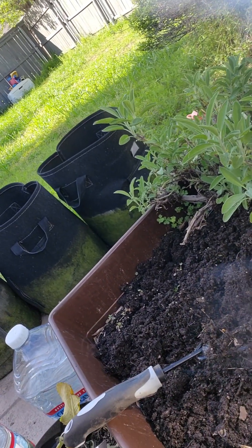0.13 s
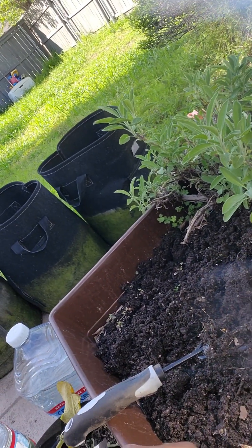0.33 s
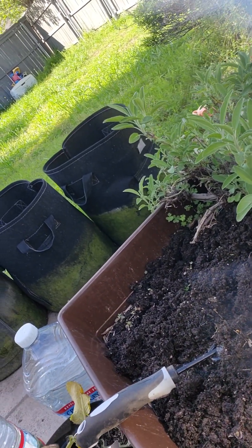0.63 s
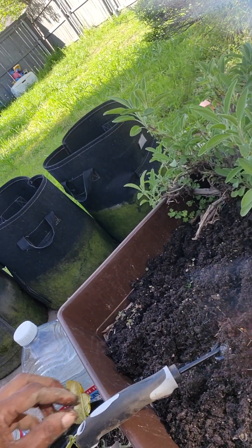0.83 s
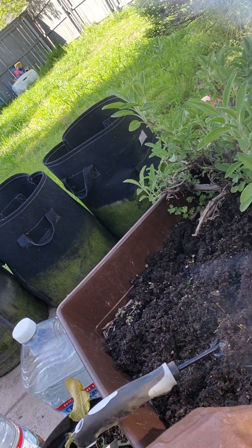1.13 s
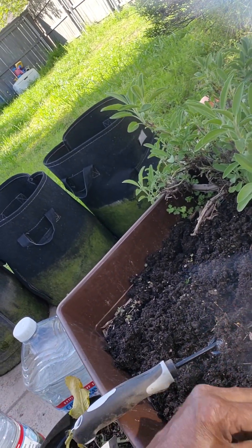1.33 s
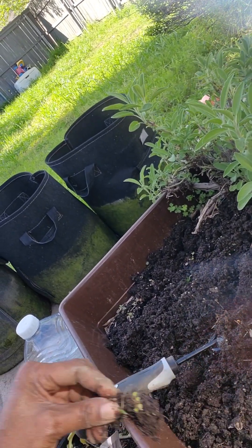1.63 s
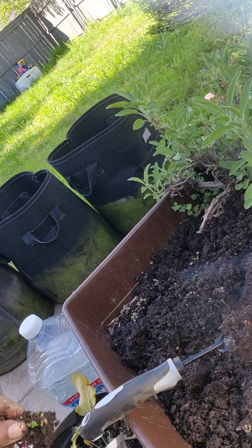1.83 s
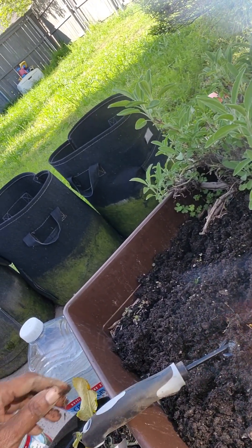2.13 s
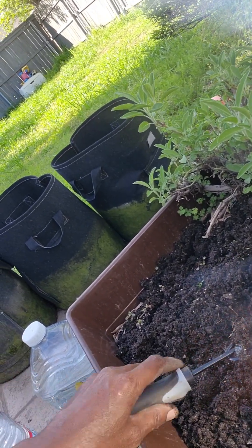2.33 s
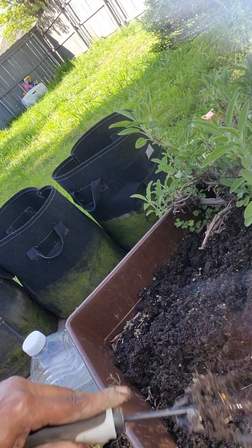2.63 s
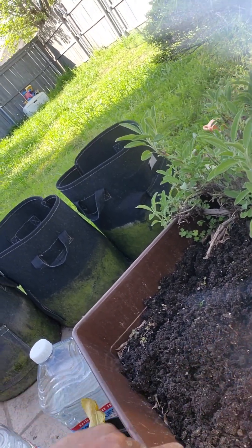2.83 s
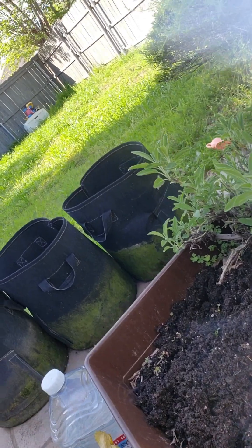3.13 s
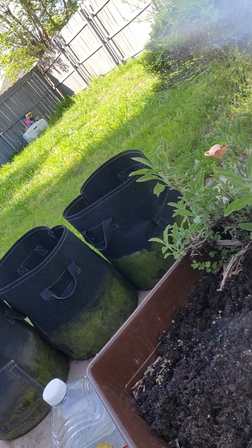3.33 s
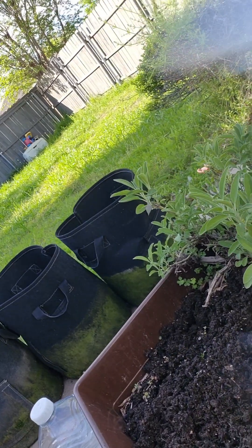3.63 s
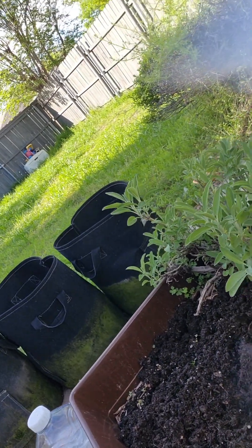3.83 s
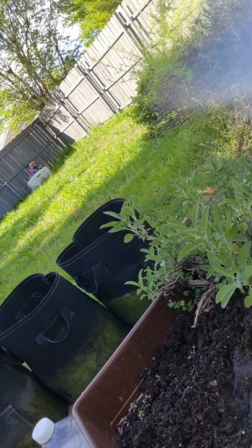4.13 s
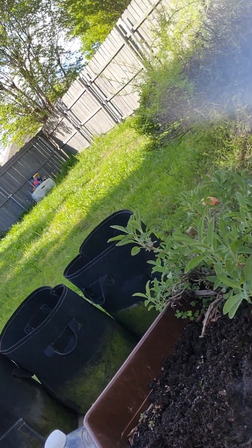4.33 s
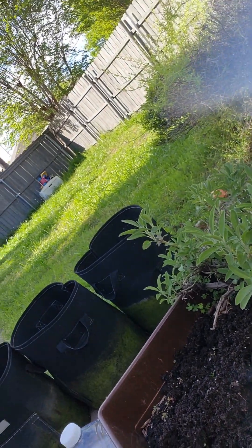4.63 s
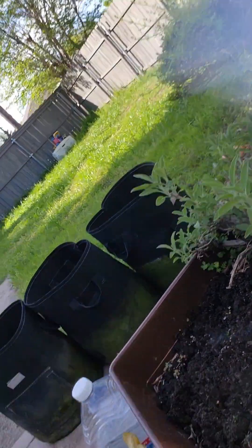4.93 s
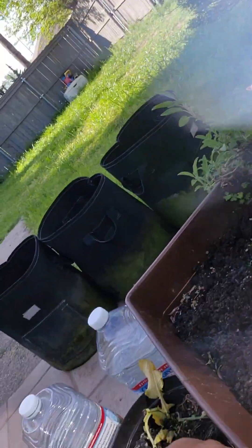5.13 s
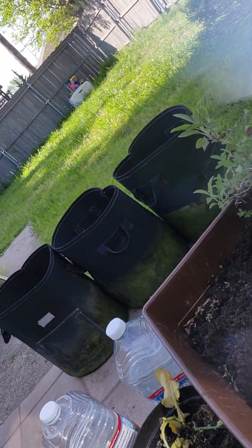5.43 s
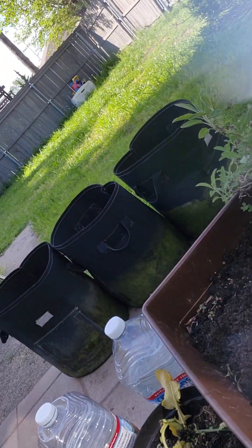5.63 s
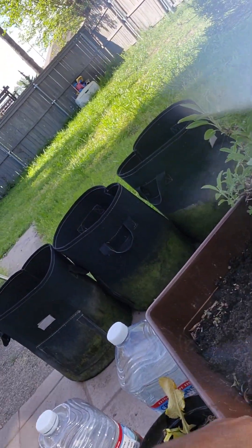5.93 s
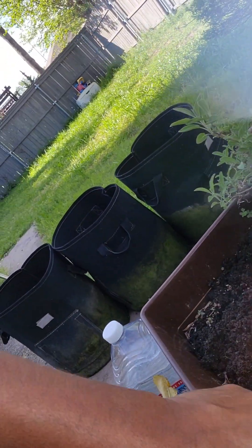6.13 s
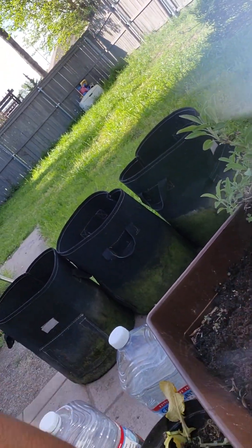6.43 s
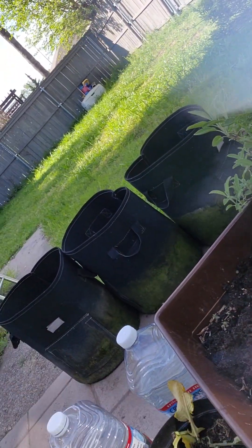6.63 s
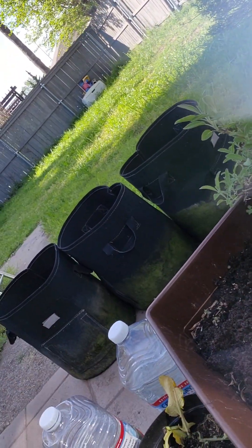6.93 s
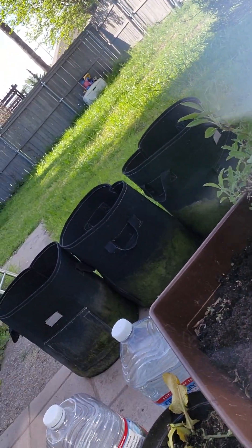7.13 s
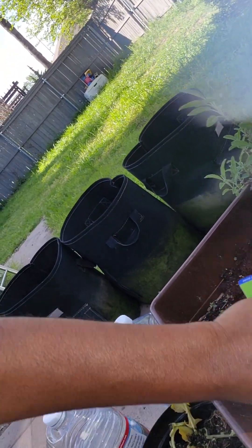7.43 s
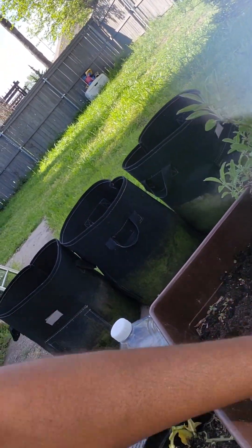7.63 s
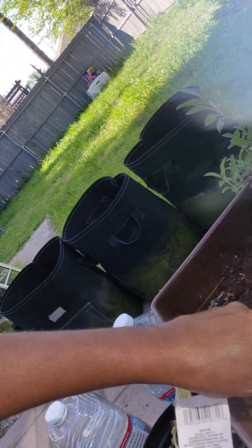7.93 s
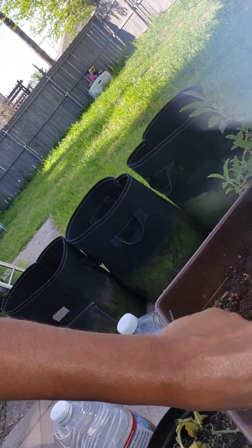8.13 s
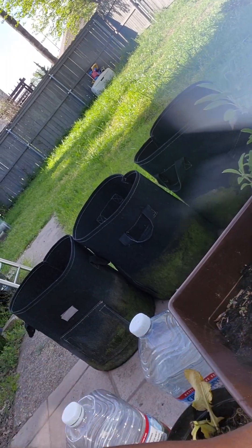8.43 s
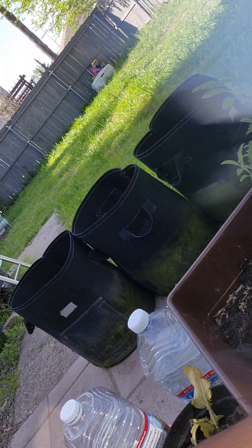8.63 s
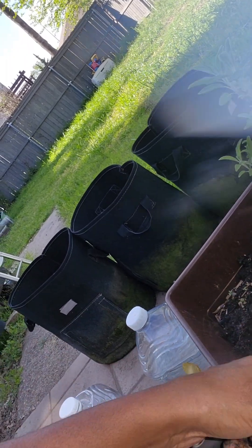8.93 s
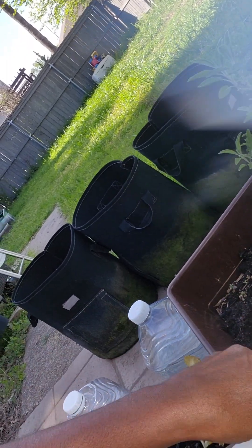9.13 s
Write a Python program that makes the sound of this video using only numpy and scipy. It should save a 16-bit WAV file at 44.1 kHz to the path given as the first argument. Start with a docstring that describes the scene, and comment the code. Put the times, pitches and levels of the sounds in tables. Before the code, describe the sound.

Close weeding in a back yard, over a steady low town rumble, far traffic and a faint machine hum. In the first second, dry stems give a few small, bright snaps and soil crumbles softly. Very faint, distant bird-like whistles step upward between about 1 and 3 seconds. From around 2.3 seconds a sleeve rustles with each arm stroke, and a hand tool lightly taps a plastic planter amid more crackling. A sharp stem crack comes at 3.7 seconds, followed by roots tearing and soil crunching. The loudest sounds are two hollow knocks on the planter, each with a crisp snap, at about 5.1 and 6.1 seconds, with lighter knocks near 5.4. A cluster of dry crackles and a tap follows around 7 to 7.4 seconds. Softer crunches, snaps and taps thin out by about 9 seconds.

```python
"""Back yard: weeding a plastic planter, close by.
Roots tear and soil crumbles in clouds of tiny fractures; dry stems crack and ring briefly.
A sleeve rustles by friction with each arm stroke. A hand tool knocks the planter, ringing its walls.
Behind: town rumble, far traffic, a machine's hum and a few faint far whistles."""
import sys
import numpy as np
from scipy import signal
from scipy.fft import rfft, irfft, next_fast_len
from scipy.io import wavfile

SR = 44100
rng = np.random.default_rng(int(sys.argv[2]) if len(sys.argv) > 2 else 0)


def dump_mix(stems):
    """Bounce the given channels to the path in sys.argv[1] as a 16-bit WAV at rate SR."""
    frames = np.atleast_2d(stems).T  # one column per channel
    limited = np.clip(frames, -1, 1)  # hard clip at full scale
    pcm = np.round(limited * 32767).astype(np.int16)
    wavfile.write(sys.argv[1], SR, pcm)


N = 409248
TIME_S = np.arange(N) / SR

# stereo likeness of noise: (frequency [Hz], left-right correlation [ratio])
CORRELATION = [(30, 0.72), (100, 1), (500, 0.81), (1200, 0.043), (4000, 0.046), (9000, 0.6), (15000, 0.15)]
# low background: (time [s], rumble [dB], murmur [dB])
YARD_LEVELS = [(0.0, -49.5, -56), (0.41, -46.5, -55), (1.6, -49.5, -53), (3.18, -47.5, -54),
               (3.77, -40.5, -51), (4.11, -47.5, -50), (4.5, -42, -47.5), (4.91, -48.5, -49.5),
               (5.35, -45, -50.5), (6.59, -49.5, -49.5), (8.92, -46, -53), (9.28, -44.5, -49.5)]
# town rumble: (frequency [Hz], density [dB])
RUMBLE_SPECTRUM = [(20, -29), (32, -13.5), (45, -1.5), (70, -2.5), (100, 0.5), (130, 4.5), (165, -11),
                   (230, -9.5), (400, -35)]
# low murmur: (frequency [Hz], density [dB])
MURMUR_SPECTRUM = [(120, -32.5), (200, 0), (260, -1.5), (350, 3), (440, -7), (560, -11.5), (750, -22.5),
                   (1200, -21)]
# far traffic and leaves: (frequency [Hz], density [dB])
FAR_SPECTRUM = [(300, -1), (550, 0.5), (700, 7), (790, -0.5), (890, 4.5), (990, -1.5), (1080, -1.5),
                (1250, -6.5), (1480, -3), (1750, -13), (3000, -23.5), (4800, -26), (10500, -32),
                (16000, -25)]
# machine hum: (frequency [Hz], rms level [dB])
HUM_PARTIALS = [(120, -66.5), (241, -57.5), (719, -71.5), (885, -80.5)]
# roots tearing, soil crumbling or pressed: (time [s], length [s], level [dB], centre [Hz])
SOIL_CRUNCHES = [(0.042, 0.23, -62.5, 11900), (0.586, 0.052, -63.5, 11500), (0.713, 0.037, -58, 9500),
                 (0.73, 0.02, -53.5, 1700), (1.213, 0.14, -66, 7500), (1.893, 0.027, -57, 11100),
                 (2.025, 0.054, -54, 4500), (2.027, 0.033, -51, 1600), (2.3, 0.014, -59.5, 7000),
                 (2.378, 0.073, -54, 5540), (2.408, 0.034, -47.5, 1110), (2.781, 0.068, -46, 6100),
                 (2.783, 0.044, -43.5, 730), (3.258, 0.025, -61, 1100), (3.604, 0.12, -52, 6200),
                 (4.137, 0.01, -59, 1700), (4.208, 0.11, -54, 2600), (4.523, 0.043, -45.5, 800),
                 (4.654, 0.062, -41.5, 2680), (5.126, 0.022, -32, 1880), (5.749, 0.015, -54.5, 3520),
                 (6.126, 0.011, -36, 3000), (6.043, 0.041, -54, 11000), (6.236, 0.017, -36, 11000),
                 (6.44, 0.025, -47.5, 3550), (7.036, 0.048, -48, 6360), (7.149, 0.012, -38.5, 3200),
                 (7.165, 0.045, -49, 4400), (7.232, 0.016, -47, 1700), (7.557, 0.14, -56, 2130),
                 (8.06, 0.024, -52, 2580), (8.109, 0.065, -46, 1900), (8.127, 0.023, -48, 4650),
                 (8.186, 0.012, -45, 915), (8.476, 0.073, -58, 2300), (8.813, 0.0093, -55.5, 2000)]
# dry stems, thin ones brighter, and the bright crack of the tool's blows at 5.12, 6.12 and 8.59 s: (time [s],
# level [dB], tilt [dB/oct], ring [Hz], left over right [dB])
SNAPS = [(0.0924, -31, 7.5, 14800, -10), (0.16, -39.5, 3, 8500, -6), (0.72, -32.5, 7, 8350, -3),
         (0.7215, -33, 5, 5250, -4.5), (0.782, -51, -1, 4900, -4), (0.821, -40, 1, 8400, -8),
         (0.828, -34, 10, 14500, -12), (0.834, -42.5, -4, 5200, -6), (2.056, -42, 7, 13500, -7),
         (2.072, -41, -2, 8500, -4), (2.191, -47.5, -3.5, 8550, -5), (2.5623, -45.5, -2, 8550, -2),
         (2.752, -34.5, 5, 4700, -4), (2.801, -30, 0, 14100, 0), (2.8101, -27.5, -2, 8360, -2),
         (2.85, -34, 1, 12900, -5), (2.9592, -28.5, 4, 13600, -5), (3.414, -44, -2, 13000, -5),
         (3.6992, -17, -1.5, 4400, -3.5), (3.77, -43, -3.5, 8800, -6), (4.089, -35, 11, 15000, -5),
         (4.1065, -25.5, -3, 8800, -5), (4.67, -33.5, 1, 4600, -13), (4.6938, -31, 1, 12900, -8),
         (4.94, -47, -7, 8450, -9), (5.12, -17, 7, 8200, -4), (5.613, -39, 5, 12500, -7),
         (6.1174, -19, -2.5, 12600, -7.5), (6.1874, -33, 5, 8640, -4), (6.2245, -31, -1.5, 8500, -1),
         (6.25, -20.5, 4.5, 12300, -2), (6.572, -35.5, -9, 4500, -4), (6.8835, -38.5, -1, 8500, -4),
         (7.004, -34, 1, 5630, -8), (7.031, -32, 5, 6300, -2), (7.036, -36, 3, 6100, -8),
         (7.0425, -35.5, -1, 5750, -1), (7.067, -33.5, -1, 5320, -7), (7.073, -36, -1, 8400, -7),
         (7.156, -27, -1, 7760, 1), (7.16, -29.5, 0, 7400, -11), (7.177, -45, -3, 8500, -5),
         (7.19, -42, 1, 8500, -5), (7.2977, -42.5, -5, 2700, -5), (7.415, -34.5, 1.5, 5500, -4),
         (7.826, -40.5, -7, 2270, -10.5), (8.085, -36, -6, 5060, 1), (8.119, -30, -2, 15000, -6),
         (8.5928, -36.5, 1, 6960, -6)]
# bright ranges shared by every close sound, which colour each crack: (low edge [Hz], high edge [Hz])
CRACK_BANDS_HZ = [(1800, 3700), (4000, 5630), (7850, 10360), (12400, 15330)]
# far notes, stepping up then falling: (time [s], length [s], pitch [Hz], level [dB])
WHISTLE_NOTES = [(1.01, .09, 1970, -80), (1.158, 0.083, 2090, -77.5), (1.283, 0.07, 2250, -77),
                 (1.39, .1, 2580, -85), (1.583, 0.83, 2980, -81.5), (2.212, 0.31, 2830, -75),
                 (2.467, 0.39, 2880, -81), (2.83, .12, 3000, -77), (3.078, 0.12, 2580, -71)]
# arm strokes: (time [s], length [s], rustle [dB], weave rasp [dB])
ARM_STROKES = [(2.286, 0.77, -69, 3), (2.943, 0.095, -55.5, 1), (3.103, 1, -64.5, 5.5),
               (4.083, 0.64, -60.5, 8.5), (4.316, 0.36, -59.5, -7), (4.584, 0.11, -55.5, 3),
               (5.082, 0.43, -56.5, -2), (5.39, 0.085, -53.5, 6), (5.641, 0.072, -66.5, -36),
               (6.136, 0.28, -56.5, 3.5), (6.499, 0.093, -53, 3), (6.677, 0.18, -57, -7),
               (7.035, 0.84, -61, 3), (8.004, 0.12, -59, 4), (8.184, 0.24, -64.5, -1),
               (8.381, 0.18, -58.5, 5), (8.907, 0.051, -62, 0)]
# cloth friction: (frequency [Hz], density [dB])
CLOTH_SPECTRUM = [(350, -12.5), (600, 3.5), (1000, -2.5), (1500, -4.5), (2300, -5), (3500, -8), (5000, -6),
                  (6500, -10.5), (7700, -10.5), (8700, -5.5), (10700, -12.5), (13000, -8), (16000, -13.5)]
# tool on planter: (time [s], ring [dB], struck spot [Hz], clack [dB], contact cut-off [Hz])
TOOL_BLOWS = [(2.417, -48.5, 880, -30.5, 1970), (2.747, -59, 704, -34, 2500), (2.793, -46, 410, -47, 1190),
              (2.812, -41.5, 360, -37.5, 3000), (3.263, -46.5, 330, -33.5, 1000),
              (4.54, -38.5, 383, -33, 885), (4.668, -49, 556, -28.5, 2500), (4.742, -47, 452, -54, 900),
              (5.118, -23.5, 1350, -8.5, 4700), (5.1184, -29, 570, -17.5, 2030),
              (5.1219, -24, 290, -10, 2000), (5.318, -48, 696, -42, 1200), (5.412, -29.5, 295, -18, 2570),
              (5.462, -26.5, 298, -23.5, 1160), (6.1176, -17.5, 565, -7.5, 3340),
              (6.1223, -24.5, 275, -37, 1300), (6.1328, -26.5, 527, -25, 1790),
              (6.224, -41, 414, -45, 2000), (6.481, -36.5, 320, -32, 690), (7.157, -50, 640, -38, 1500),
              (7.2296, -47, 1436, -21, 2440), (7.2318, -45, 297, -44, 1800), (8.412, -49, 593, -44, 1540),
              (8.5923, -54, 1300, -27, 3260), (8.9, -49, 454, -39, 590)]
# planter wall modes: (frequency [Hz], level [dB], t60 [s])
WALL_MODES = [(127, -9.5, 0.35), (261.4, -1, 0.11), (297.3, 7.5, 0.1), (397, -0.5, 0.06),
              (458.5, 5.5, 0.064), (553, 4, 0.051), (644, 9, 0.043), (772, -10.5, 0.12), (1063, 0, 0.057),
              (1317, 2, 0.055), (1872, 6.5, 0.045), (2220, 3.5, 0.0324), (2700, -4, .035),
              (3260, -19, 0.04), (4310, 7, 0.029), (4930, 13, 0.029)]


def from_db(db):
    """Decibels to gain."""
    return 10 ** (np.asarray(db) / 20)


def unit_rms(x):
    """Scale to rms 1."""
    return x / np.sqrt(np.mean(x ** 2) + 1e-20)


def unit_peak(x):
    """Scale to peak 1."""
    return x / np.abs(x).max()


def at_hz(table, hz):
    """Interpolate over log frequency."""
    table_hz, values = np.transpose(table)
    return np.interp(np.log(hz), np.log(table_hz), values)


def band(x, low_hz, high_hz, order=2):
    """Butterworth band-pass."""
    sos = signal.butter(order, [low_hz, min(high_hz, .45 * SR)], "band", fs=SR, output="sos")
    return signal.sosfilt(sos, x)


def decay(t, t60_s):
    """Exponential fall, 60 dB per t60_s."""
    return np.exp(-np.log(1000) * t / t60_s)


def drift(rate_hz, hop=40, settle=2000):
    """Slow random wander, rms 1."""
    pole = np.exp(-2 * np.pi * rate_hz * hop / SR)
    white = rng.standard_normal(N // hop + settle + 2)
    slow = signal.lfilter([1], [1, -2 * pole, pole * pole], white)[settle:]
    return np.interp(np.arange(N) / hop, np.arange(len(slow)), unit_rms(slow))


def add(out, start_s, sound):
    """Mix in at start_s."""
    i = int(start_s * SR)
    out[:, i:i + sound.shape[-1]] += sound[..., :N - i]


def widen(pair, correlation):
    """Independent pair to correlated left and right."""
    correlation = np.clip(correlation, 0, .995)
    mid = np.sqrt(1 + correlation) * pair[0]
    side = np.sqrt(1 - correlation) * pair[1]
    return np.array([mid + side, mid - side]) / np.sqrt(2)


def coloured(spectrum, pair):
    """Independent pair to stereo with the given spectrum, rms 1."""
    size = next_fast_len(N)
    hz = np.maximum(np.fft.rfftfreq(size, 1 / SR), 1)
    rolloff = 1 / np.hypot(1, (spectrum[0][0] / hz) ** 4) / np.hypot(1, (hz / spectrum[-1][0]) ** 10)
    stereo = widen(rfft(pair, size), at_hz(CORRELATION, hz))
    return unit_rms(irfft(stereo * from_db(at_hz(spectrum, hz)) * rolloff, size)[:, :N])


def pan(x, pan_db, lag_s=0):
    """Set left over right by pan_db; delay the left by lag_s."""
    index = np.arange(x.shape[1])
    left = np.interp(index - round(lag_s * SR), index, x[0], left=0)
    return np.array([left, x[1]]) * from_db([[pan_db / 2], [-pan_db / 2]])


def grains(size, per_s, spread_db):
    """Two rows of impulses at shared random times, mostly small; rms 1."""
    hits = rng.random(size) < per_s / SR
    gains = from_db(spread_db * np.minimum(rng.exponential(1, size), 5))
    return unit_rms(hits * gains * rng.standard_normal((2, size)))


def town(rumble_gain_db=2, murmur_gain_db=-1, lumps_db=2.47, far_db=-64.5):
    """Lumpy rumble and low murmur under steady far traffic and leaves."""
    times_s, *levels_db = np.transpose(YARD_LEVELS)
    rumble_db, murmur_db = [np.interp(TIME_S, times_s, db) for db in levels_db]
    white = rng.standard_normal((3, 2, N))
    rumble_db += rumble_gain_db + lumps_db * drift(35)
    rumble = from_db(rumble_db) * coloured(RUMBLE_SPECTRUM, white[0])
    murmur = from_db(murmur_db + murmur_gain_db) * coloured(MURMUR_SPECTRUM, white[1])
    far = from_db(far_db) * coloured(FAR_SPECTRUM, white[2])
    return rumble + murmur + far


def machine_hum(waver_rad=1.04, waver_hz=1.86):
    """Neighbourhood machine: sine partials wavering in phase."""
    return sum(from_db(db) * np.sqrt(2) * np.sin(2 * np.pi * hz * TIME_S + waver_rad * drift(waver_hz))
               for hz, db in HUM_PARTIALS)


def soil_crunches(edge_ratio=2.06, release_t60_s=0.093, trickle_db=-19, trickle_t60_s=0.95, gain_db=-7):
    """Dense tiny fractures merge into a soft brush; grains then trickle down."""
    out, t = np.zeros((2, N)), np.arange(SR // 3) / SR
    for start_s, length_s, level_db, centre_hz in SOIL_CRUNCHES:
        swell = np.clip(t / (0.37 * length_s), 0, 1)
        after_s = np.maximum(t - 0.79 * length_s, 0)
        breaking = grains(len(t), per_s=7000, spread_db=1.8) * decay(after_s, release_t60_s)
        trickle = grains(len(t), per_s=1500, spread_db=1.8) * decay(after_s, trickle_t60_s)
        cloud = widen(swell * (breaking + from_db(trickle_db) * trickle), 0.096)
        cloud = band(cloud, centre_hz / edge_ratio, centre_hz * edge_ratio)
        add(out, start_s, from_db(level_db + gain_db) * cloud / np.std(cloud[:, t < length_s]))
    return pan(out, pan_db=-1.5, lag_s=0.00019)


def snaps(crack_t60_s=0.0092, tail_db=-26, tail_t60_s=0.19, ring_db=-5, half_width_hz=275):
    """A stem, or the edge of a tool blow, cracks and rings at its own pitch; its fibres shiver after."""
    out, t = np.zeros((2, N)), np.arange(SR // 10) / SR
    envelope = decay(t, crack_t60_s) + from_db(tail_db) * decay(t, tail_t60_s)
    for start_s, level_db, tilt_db_per_oct, ring_hz, pan_db in SNAPS:
        burst = widen(rng.standard_normal((2, len(t))), 0.41) * envelope
        crack = 0
        for edges_hz in CRACK_BANDS_HZ:
            octaves = np.log2(np.mean(edges_hz) / np.mean(CRACK_BANDS_HZ))
            gain = from_db(tilt_db_per_oct * octaves) * np.sqrt(np.ptp(edges_hz))
            crack += gain * unit_rms(band(burst, *edges_hz))
        ring = band(burst, ring_hz - half_width_hz, ring_hz + half_width_hz, order=1)
        snap = unit_peak(unit_rms(crack) + from_db(ring_db) * unit_rms(ring))
        lag_s = 0.00023 * rng.uniform(0.77, 1.1)  # each snap in its own place
        add(out, start_s, pan(from_db(level_db) * snap, pan_db, lag_s))
    return out


def far_whistles(gain_db=0.5, attack_s=0.028, echo_t60_s=0.65):
    """Perhaps a bird: notes swell, hold and echo away, blurred by distance into narrow noise bands."""
    out, t = np.zeros((2, N)), np.arange(SR) / SR
    for start_s, length_s, hz, level_db in WHISTLE_NOTES:
        blur_hz = 85 * (hz / 2580) ** 5
        tone = unit_rms(band(rng.standard_normal((2, len(t))), hz - blur_hz, hz + blur_hz))
        envelope = np.clip(t / attack_s, 0, 1) * decay(np.maximum(t - length_s, 0), echo_t60_s)
        add(out, start_s, from_db(level_db + gain_db) * envelope * tone)
    return out


def arm_levels_db(attack_s=0.053, release_t60_s=1, rest_db=-74):
    """Rustle level and weave rasp: strokes rise, hold, decay and add in power."""
    power, weighted_rasp = from_db(rest_db) ** 2, 0
    for start_s, length_s, level_db, rasp_db in ARM_STROKES:
        t = TIME_S - start_s
        envelope = np.clip(t / attack_s, 0, 1) * decay(np.maximum(t - length_s, 0), release_t60_s)
        stroke_power = (from_db(level_db) * envelope) ** 2
        power += stroke_power
        weighted_rasp += rasp_db * stroke_power
    return 10 * np.log10(power), weighted_rasp / power


def sleeve(fold_swing_db=2.2, fold_hz=8, rasp_swing_db=2, flutter_db=1.5, gain_db=-1):
    """Cloth friction, grittier with effort; the colour wanders as folds shift."""
    level_db, rasp_db = arm_levels_db()
    effort = np.clip((level_db - level_db.min()) / 30, 0, 1)
    grit = from_db(2 * drift(12)) * grains(N, per_s=3000, spread_db=2.8)
    upper = coloured(CLOTH_SPECTRUM, rng.standard_normal((2, N)) + effort * grit)
    cloth = 0
    for edge_hz in np.geomspace(800, 17000, 9):
        lower = signal.sosfiltfilt(signal.butter(4, edge_hz, fs=SR, output="sos"), upper)
        cloth += lower * from_db(fold_swing_db * drift(fold_hz))
        upper -= lower
    rasp_gain = from_db(rasp_db + rasp_swing_db * drift(11.5))
    cloth += (rasp_gain - 1) * band(cloth, 900, 2730, order=1)
    cloth *= from_db(level_db + gain_db + flutter_db * drift(19))
    return pan(cloth, pan_db=-3.5, lag_s=0.00026)


def wall_ring(t, spot_hz, contact_hz, focus_db_per_oct=6, dent_db=7, dent_t60_cycles=8, contact_s=0.0009):
    """A blow dents the plastic and rings the walls, most near the struck spot's pitch."""
    hz, mode_db, t60_s = np.transpose(WALL_MODES)[:, :, None]
    struck_db = mode_db - focus_db_per_oct * np.abs(np.log2(hz / spot_hz)) + rng.normal(0, 1, hz.shape)
    gains = from_db(struck_db) / np.hypot(1, (hz / contact_hz) ** 2)
    modes = np.sum(gains * np.cos(2 * np.pi * hz * t) * decay(t, t60_s), axis=0)
    dent = np.cos(2 * np.pi * spot_hz * t) * decay(t, dent_t60_cycles / spot_hz)
    ring = modes + from_db(dent_db) * gains.max() * dent
    ring = band(ring * (1 - np.exp(-t / contact_s)), 105, 6000)
    ring -= 0.85 * band(ring, 170, 224, order=1)  # hollow between the two lowest modes
    return ring / np.std(ring[t < 0.02])


def wall_clack(t, contact_hz, t60_s=0.029, scatter_db=-17, scatter_t60_s=0.21):
    """Crowded short modes as a noise burst, plus dull scatter off paving and fence."""
    white = widen(rng.standard_normal((2, len(t))), 0.3)
    scatter = from_db(scatter_db) * band(white, 140, 1500, order=1) * decay(t, scatter_t60_s)
    clack = white * decay(t, t60_s) + scatter
    clack -= 0.64 * band(clack, 3600, 3900, order=1)  # weak wall response
    clack -= 0.2 * band(clack, 580, 1600, order=1)  # gap between body and wall modes
    clack -= 0.19 * band(clack, 3730, 12000, order=1)  # modes thin out
    clack = band(clack, 371.5, contact_hz, order=1)  # soft contact is dull
    return unit_peak(band(clack, 280, contact_hz * 1.22))


def tool_knocks():
    """A hand tool hits the planter: wall ring under a clack."""
    out, t = np.zeros((2, N)), np.arange(SR // 3) / SR
    for start_s, ring_db, spot_hz, clack_db, contact_hz in TOOL_BLOWS:
        ring = from_db(ring_db) * wall_ring(t, spot_hz, contact_hz)
        clack = pan(from_db(clack_db) * wall_clack(t, contact_hz), pan_db=-2)
        add(out, start_s, pan(ring + clack, pan_db=-0.071, lag_s=0.0002))
    return out


def scene():
    """Close work over the yard's background."""
    return (town() + machine_hum() + soil_crunches() + snaps()
            + far_whistles() + sleeve() + tool_knocks())


def record(dry, cutoff_hz=15900):
    """Steep elliptic low-pass."""
    return signal.sosfilt(signal.ellip(10, .1, 80, cutoff_hz, fs=SR, output="sos"), dry)


dry = scene()
out = record(dry)
dump_mix(out)
```